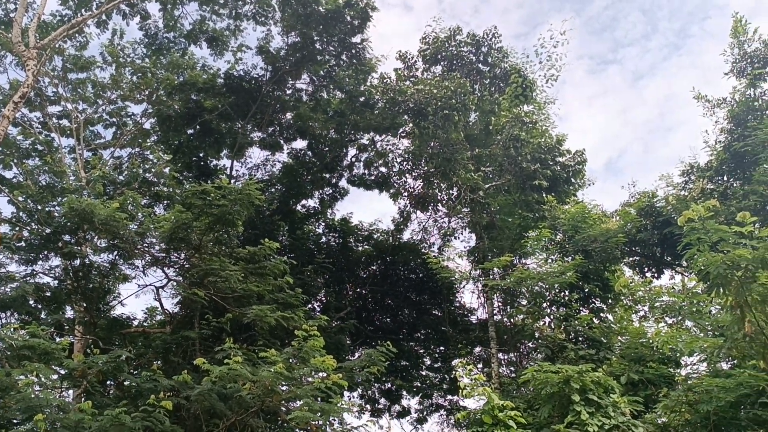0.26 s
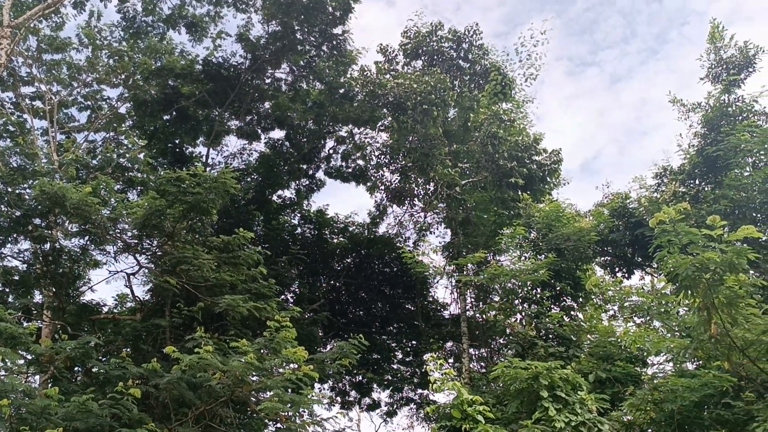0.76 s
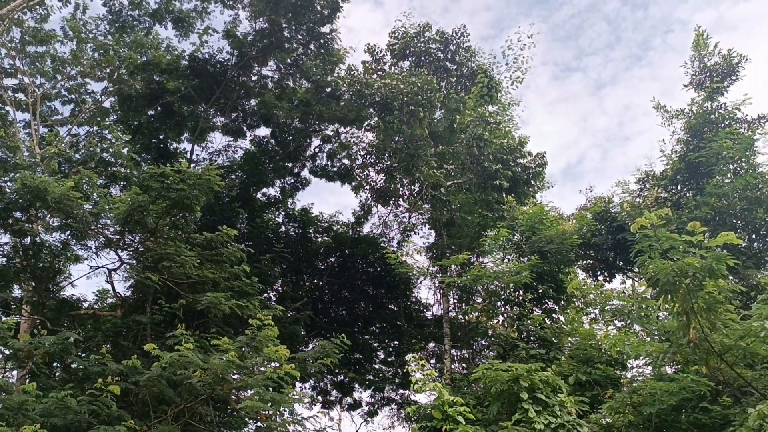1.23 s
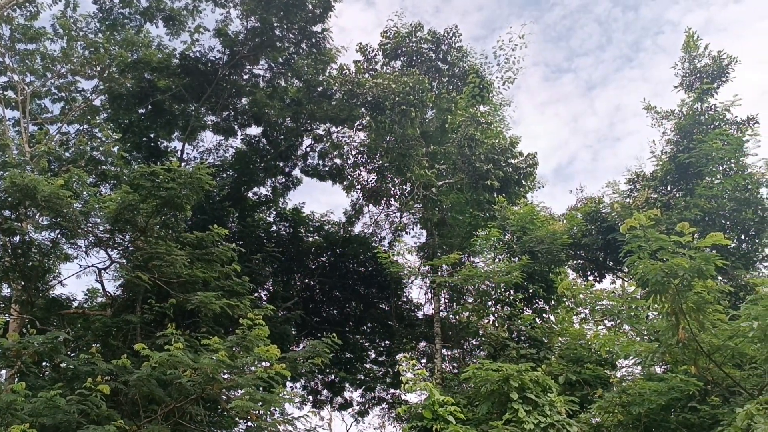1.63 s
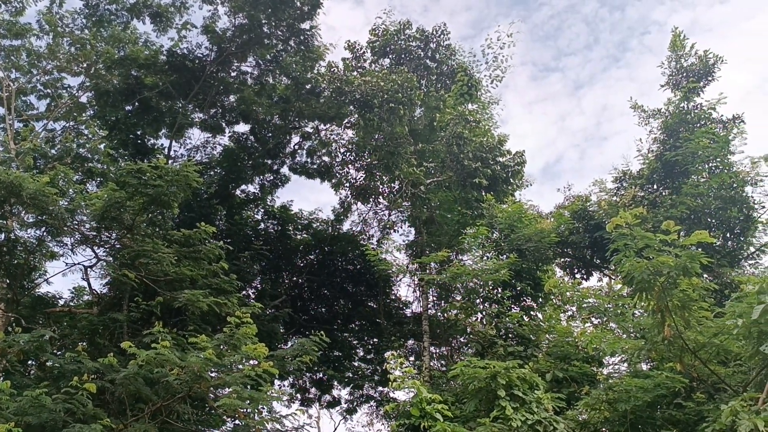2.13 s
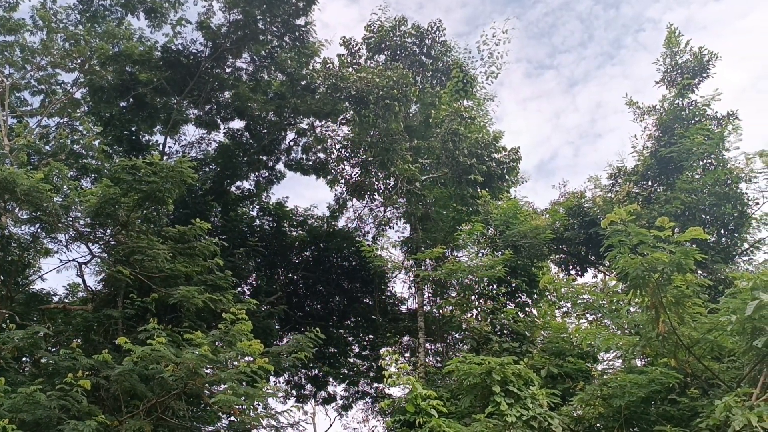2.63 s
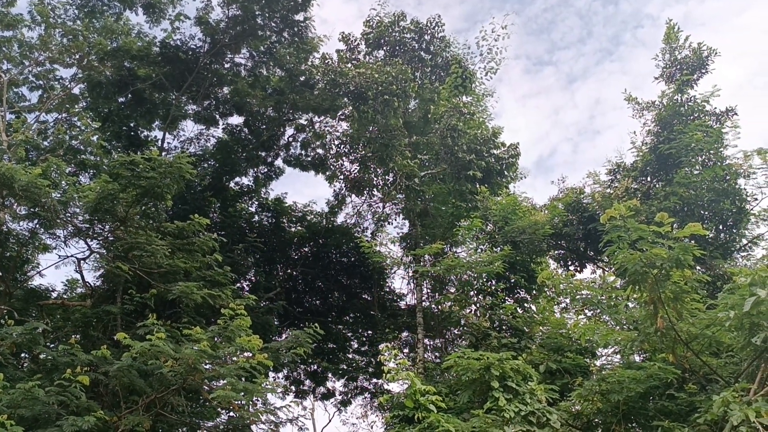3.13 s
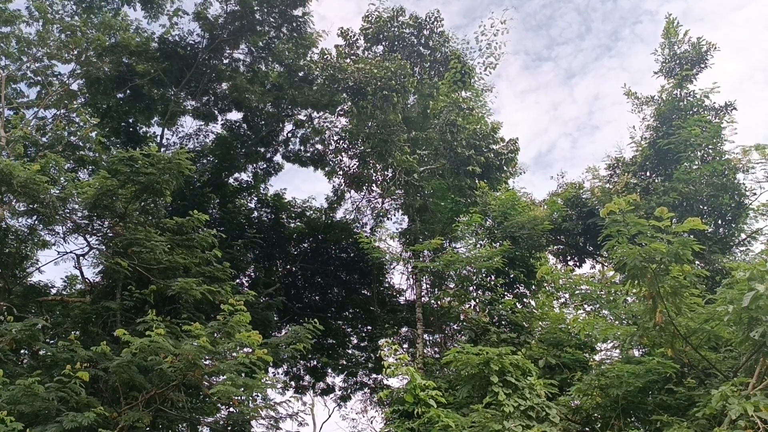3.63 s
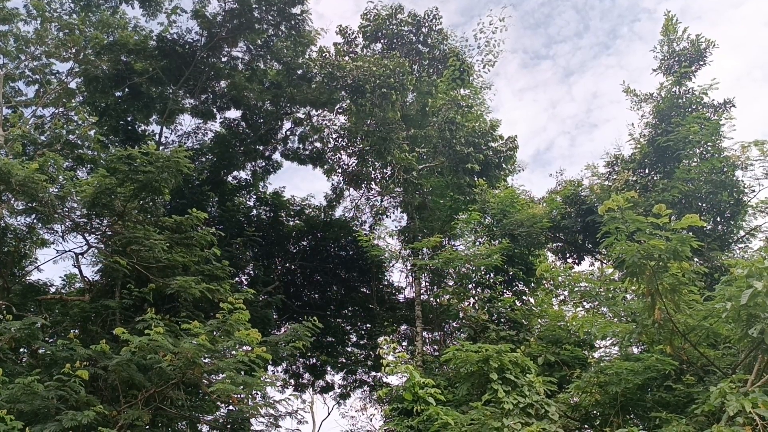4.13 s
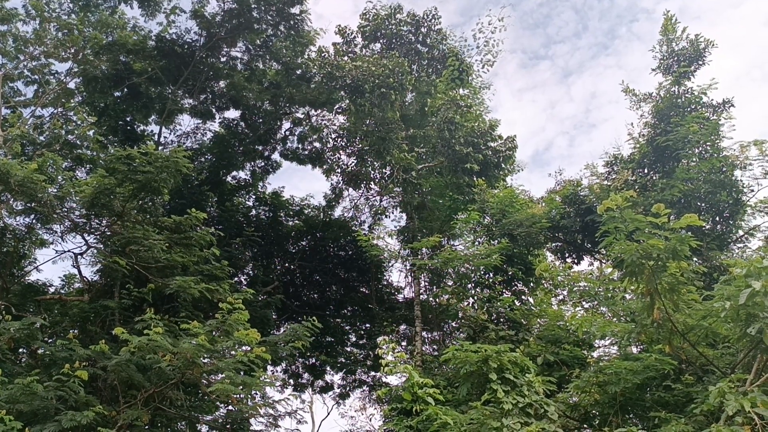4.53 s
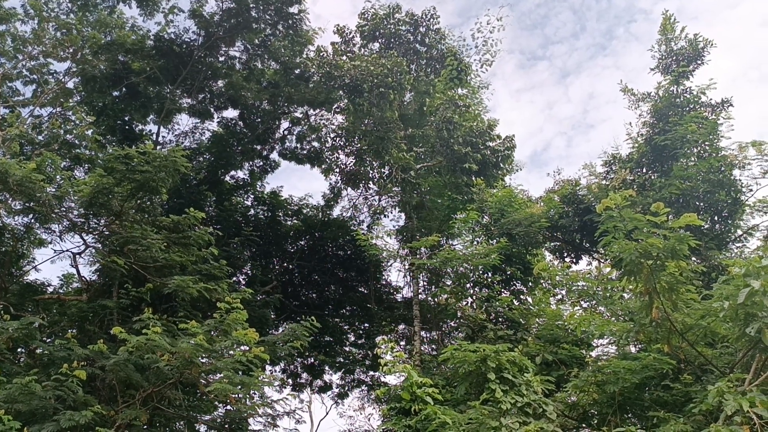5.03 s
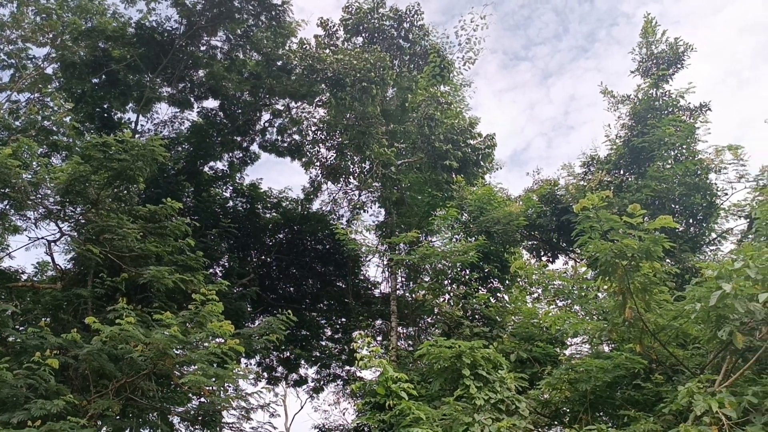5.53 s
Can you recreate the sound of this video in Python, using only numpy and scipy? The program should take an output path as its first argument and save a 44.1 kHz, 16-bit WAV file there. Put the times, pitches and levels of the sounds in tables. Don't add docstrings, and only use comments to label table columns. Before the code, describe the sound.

Steady cicada ringing and high katydid rasps fill an open forest, with leaf noise and faint distant traffic. A large bird begins with weak hoarse croaks, grows louder and faster into rough honking cackles, then a second bird gives a short clear honk among thin whistles. Calls echo softly off trees; afterwards only insects remain. Hand-held stereo microphone, with soft finger bumps.

```python
import sys
import numpy as np
from scipy import signal
from scipy.fft import rfft, irfft
from scipy.io import wavfile
from scipy.ndimage import uniform_filter1d

SR = 44100
rng = np.random.default_rng(int(sys.argv[2]) if len(sys.argv) > 2 else 0)


def gain_from_db(level_db):
    decades = np.asarray(level_db, float) / 20
    return 10 ** decades


def to_wav(s):
    ch = np.atleast_2d(s).T
    pcm = np.round(np.clip(ch, -1, 1) * 32767)
    wavfile.write(sys.argv[1], SR, pcm.astype(np.int16))


N = 254016

# from t/s, to t/s, hoarseness (0-1)
LOCKS = [
    (2.185, 2.308, .02),
    (2.575, 2.632, .12),
    (2.915, 2.965, .3),
    (3.345, 3.392, .25),
    (3.478, 3.525, .35),
    (3.708, 3.748, .4),
]


def evened(x):
    return x / np.sqrt(np.mean(x ** 2) + 1e-20)


def read(points, hz, axis=1):
    table = np.transpose(points)
    return np.interp(np.log(hz + 1), np.log(table[0] + 1), table[axis])


def columns(rows, t):
    s, *values = np.transpose(rows)
    return [np.interp(t, s, v) for v in values]


def add(mix, s, sound):
    part = mix[round(s * SR):][:len(sound)]
    part += sound[:len(part)]


def resonate(x, hz, width):
    turn = np.exp(2j * np.pi * np.cumsum(hz * np.ones(x.shape[-1])) / SR)
    r = np.exp(-np.pi * width / SR)
    two_poles = np.convolve([1, -r], [1, -r])
    return 2 * (turn * signal.lfilter([(1 - r) ** 2], two_poles, x / turn + 1e-18)).real


def wander(count, s):
    return evened(uniform_filter1d(rng.standard_normal(count), max(int(s * SR), 1)))


def edges(count, s=0.00059):
    return signal.windows.tukey(count, 2 * s * SR / count)


def far_hiss(shape_db, patchy_db):
    # f/Hz, coherence (0-1)
    likeness = [(30, 1), (130, 0.48), (400, 0.61), (1500, 0.055), (5500, 0.033), (15000, 0.067)]
    frames, hz = N // 256 + 5, np.fft.rfftfreq(1024, 1 / SR)
    a, b, c, d, patches = rng.standard_normal((frames, 513, 5)).T
    patches = evened(uniform_filter1d(uniform_filter1d(patches, 12, 0), 16, 1))
    same = np.clip(read(likeness, hz), 0, 1)[:, None]
    left, own = a + 1j * b, c + 1j * d
    late = np.exp(-2j * np.pi * hz * 0.000529)[:, None]
    z = np.array([left, same * left * late + np.sqrt(1 - same ** 2) * own])
    z = z * gain_from_db(shape_db(hz)[:, None] + patchy_db * patches)
    return evened(signal.istft(z, nperseg=1024, noverlap=768)[1][:, :N])


def air():
    # f/Hz, level/dB per Hz
    forest = [(25, -61), (150, 1), (300, -4), (600, -6), (900, -7.5), (1700, -10), (2500, -5.5),
              (4000, -3.5), (6500, -28), (8300, -23.5), (9800, -19), (11000, -12.5), (16000, -15.5)]
    traffic = [(25, -49), (45, -48), (62, 12.5), (105, -2.5), (200, -11.5), (500, -21.5), (900, -77)]
    hum = far_hiss(lambda hz: read(traffic, hz), 1.78)
    rest = far_hiss(lambda hz: read(forest, hz), 1.5)
    return gain_from_db(-56.5) * hum + gain_from_db(-52.5) * rest


def throb(per_s, depth, sharp):
    turns = np.cumsum(per_s * (1 + 0.0066 * wander(N, 1.0))) / SR
    return evened(1 - depth + depth * np.exp(-(turns % 1) / sharp))


def swells(t):
    # t/s, level/dB
    tops = [(.34, -53.5), (1.02, -58), (1.8, -55), (2.34, -57), (2.61, -52.5), (3.35, -52), (3.76, -54),
            (4.2, -54), (4.982, -55.5), (5.14, -58), (5.76, -58)]
    rise_db_per_s, cut_db_per_s, rest_db = 31, 122, -62
    s, db = np.transpose(tops)[:, :, None]
    each = db - rise_db_per_s * np.maximum(s - t, 0) - cut_db_per_s * np.maximum(t - s, 0)
    return np.maximum(each.max(0), rest_db)


def insects():
    # f/Hz, level/dB per Hz
    body = [(2650, -54), (4500, -21.5), (5010, -11), (5240, -4.5), (5520, 6), (5780, -5.5), (5970, -9),
            (6230, -14.5), (6660, -25.5), (7600, -30), (9880, -137), (16700, -120)]
    # t/s, level/dB
    nearest = [
        (0, -62),
        (.35, -61.5),
        (1.3, -57),
        (1.9, -62.5),
        (5.76, -63.5),
    ]
    octave_band = [(9200, -54), (10200, -11), (10850, -4), (11100, 1.0), (11400, -8), (12500, -64)]
    rasp_band = [(8500, -77), (10000, -9), (12500, -1.0), (16000, -3.5)]
    t = np.arange(N) / SR
    clicks = throb(78, 0.96, 0.59)
    chorus = evened(far_hiss(lambda hz: read(body, hz), 0.66) * (1.2 + 0.14 * clicks))
    octave = clicks * far_hiss(lambda hz: read(octave_band, hz), 2.3)
    rasp = throb(52, 0.59, .4) * far_hiss(lambda hz: read(rasp_band, hz), 1.5)
    chorus_db = -38 + .5 * wander(N, 0.18) + 3.5
    octave_db = columns(nearest, t)[0] - 2.5
    return gain_from_db(chorus_db) * chorus + gain_from_db(octave_db) * octave + gain_from_db(swells(t) + 1.0) * rasp


def knocks():
    # t/s, level/dB, f/Hz, t60/s
    pushes = [
        (0.046, -45.5, 110, 0.034),
        (0.359, -39, 109, 0.045),
        (5.217, -40, 110, 0.066),
        (5.568, -31.5, 107, 0.028),
    ]
    out, t = np.zeros(N), np.arange(SR // 8) / SR
    for s, db, hz, t60 in pushes:
        add(out, s, gain_from_db(db - 60 * t / t60) * np.sin(2 * np.pi * hz * t))
    return out


def trees(x):
    # f/Hz, t60/s, level/dB
    decay = [(300, 0.98, 0), (1010, 0.69, -2.5), (2140, 0.71, 9), (4570, 0.41, 11), (8150, 0.31, 2)]
    taps = np.zeros((2, SR))
    at = np.arange(500, SR - 20, 20) + rng.integers(0, 20, (2, (SR - 501) // 20))
    np.put_along_axis(taps, at, rng.choice([-1., 1.], at.shape), 1)
    hz, t, z = signal.stft(taps, SR, nperseg=256)
    fall_db = read(decay, hz, axis=2)[:, None] - 60 * t / read(decay, hz)[:, None]
    tail = signal.istft(z * gain_from_db(fall_db), SR, nperseg=256)[1]
    return signal.fftconvolve(x[None], tail / np.linalg.norm(tail[0]), axes=1)[:, :N]


def leaves(x):
    t = np.arange(SR // 20) / SR
    scatter = rng.standard_normal((2, len(t))) * gain_from_db(-60 * t / 0.068)
    scatter = signal.sosfilt(signal.butter(4, 1800, "high", fs=SR, output="sos"), scatter)
    return signal.oaconvolve(x[None], scatter / np.linalg.norm(scatter[0]), axes=1)[:, :N]


def whistle(start, length, from_hz, to_hz, top_db):
    t = np.arange(start, start + length, 1 / SR)
    u = (t - start) / length
    from_top = abs(u if from_hz > to_hz else 1 - u)
    hz = max(from_hz, to_hz) - abs(from_hz - to_hz) * from_top ** 2.6
    db = top_db - 9 * (2 * u - 1) ** 2
    waver = 1 + .008 * wander(len(t), .01)
    swell_db = 2.5 * wander(len(t), .012)
    tone = np.cos(2 * np.pi * np.cumsum(hz * waver) / SR)
    return t[0], np.sqrt(2) * gain_from_db(db + swell_db) * tone * edges(len(t))


def folds(hz, hoarse, flutter, orders):
    flutter_hz = 177.3
    shake = 0.0065 + 0.1415 * hoarse ** 2
    turns = np.cumsum(hz * (1 + shake * wander(len(hz), 0.00417))) / SR
    flaps = np.cumsum(flutter_hz * (1 + .12 * wander(len(hz), 0.0068))) / SR
    tone = sum(gain_from_db(db) * np.cos(2 * np.pi * k * turns) for k, db in orders)
    tone = tone * (1 + flutter * np.cos(2 * np.pi * flaps))
    strength = gain_from_db(2 * rng.standard_normal(len(hz)))[flaps.astype(int)]
    puffs = (.25 + strength * np.exp(-(flaps % 1) / .4)) * rng.standard_normal(len(hz))
    return tone, puffs


def honk():
    # t/s, effort level/dB, pitch f/Hz, hoarseness (0-1)
    course = [
        (4.056, -43, 544, 0.1),
        (4.068, -34, 533.6, 0.04),
        (4.09, -34, 560.4, 0),
        (4.125, -38, 540.4, 0.03),
        (4.14, -36.5, 511, 0.08),
        (4.16, -63, 515, 0.1),
    ]
    orders = [(1, -11), (2, 1), (2.5, -11), (3, -12), (4, -21), (5, -14), (6, -5), (7.8, -18)]
    t = np.arange(course[0][0], course[-1][0], 1 / SR)
    effort_db, hz, hoarse = columns(course, t)
    hoarse = np.clip(hoarse, 0, 1)
    tone, puffs = folds(hz, hoarse, 0, orders)
    rasp = evened(resonate(puffs, 1330, 230))
    voice = np.sqrt(1 - hoarse) * evened(tone) + np.sqrt(hoarse) * rasp
    return t[0], gain_from_db(effort_db) * voice * edges(len(t))


def locked(t, loose, tight):
    for (start, end, hoarse), value in zip(LOCKS, tight):
        hold = np.clip(np.minimum(t - start, end - t) / .012, 0, 1)
        loose = loose + hold * (value - loose)
    return loose


def cackle(start, length, top_db, top_hz, rising):
    lower_throat = [(.36, 152, -34.5, -13), (.5, 210, -32, -13), (.74, 217, -31, -7.5), (1, 147, 1, 7),
                    (1.02, 528, -13, -3.5), (1.22, 300, -10.5, 1), (1.7, 300, -34.5, -13)]
    # f/Hz, width/Hz, level/dB
    upper_throat = [(2060, 380, -3.5), (2677, 527, 2.5), (3690, 2130, -7), (6850, 2200, -32)]
    # t/s, new pitch f/Hz, glide/s
    jumps = [
        (2.968, 531.8, 0.011),
        (3.478, 490, .03),
        (3.75, 537.3, .018),
    ]
    loud_db, flutter_low, flutter_high = -28, .25, .65
    t = np.arange(start, start + length, 1 / SR)
    u = (t - start) / length

    under_db = 24 * np.maximum(1 - u / rising, 0) ** (1.323 + 7.0 * length)
    past_db = 18.5 * np.maximum((u - rising) / (1 - rising), 0) ** (1.323 + 6.4 * length)
    effort_db = top_db - under_db - past_db

    hz, mouth_hz, flutter = top_hz, top_hz * (2 if top_hz > 480 else 3), flutter_low
    for s, new_hz, glide in jumps:
        if start < s < start + length:
            moved = np.clip((t - s) / glide, 0, 1)
            hz = hz + moved * (new_hz - hz)
            mouth_hz = mouth_hz + moved * (2 * new_hz - mouth_hz)
            flutter = flutter + moved * (flutter_high - flutter) * (new_hz > top_hz)
    sag = 1 - .008 * under_db
    hz, mouth_hz = hz * sag, mouth_hz * sag

    hoarse = np.clip(.64 + .017 * (loud_db - effort_db), 0, 1)
    hoarse = locked(t, hoarse, [row[2] for row in LOCKS])
    flutter = locked(t, flutter, [0 for row in LOCKS])
    clear_step_db = locked(t, 0, [-8.5 * (1 - row[2]) ** 2 for row in LOCKS])
    upper_db = -7.5 - .035 * (top_db - loud_db) ** 2 + 2 * u + clear_step_db

    orders = [(0.94, -3.5)] + [(k, -7.0 * max(k - 8, 0)) for k in range(2, 13)]
    tone, puffs = folds(hz, hoarse, flutter, orders)
    drive = np.sqrt(1 - hoarse) * evened(tone) + 2.42 * np.sqrt(hoarse) * puffs
    breathy = drive + 1.0 * puffs
    lower = upper = 0
    for k, (factor, width, clear_db, hoarse_db) in enumerate(lower_throat):
        db = clear_db + np.sqrt(hoarse) * (hoarse_db - clear_db)
        lower = lower + (-1) ** k * gain_from_db(db) * resonate(drive, factor * mouth_hz, width)
    for k, (f, width, db) in enumerate(upper_throat):
        upper = upper + (-1) ** k * gain_from_db(db) * resonate(breathy, f, width)
    lower, upper = [v / np.sqrt(uniform_filter1d(v ** 2, 1500) + 1e-9) for v in (lower, upper)]
    loudness_db = effort_db + locked(t, 0, [2.5 for row in LOCKS])
    return t[0], gain_from_db(loudness_db) * (lower + gain_from_db(upper_db) * upper) * edges(len(t))


def scene():
    # t/s, length/s, top effort level/dB, top pitch f/Hz, share of the length spent rising (0-1)
    syllables = [(0.435, 0.15, -48, 262, 0.37), (0.915, 0.18, -43, 325, 0.6),
                 (1.335, .19, -37.5, 366.7, 0.81), (1.528, 0.072, -36.5, 343.5, 0.27),
                 (1.8, 0.17, -34.5, 372.6, 0.82), (1.988, 0.048, -28.5, 354.4, 0.32),
                 (2.048, 0.046, -32.5, 366.7, 0.23), (2.16, .18, -28, 357.8, 0.59),
                 (2.51, .14, -28.5, 380, 0.86), (2.668, 0.066, -28, 365.9, .3),
                 (2.755, 0.056, -28, 369, 0.29), (2.815, 0.049, -36.5, 386.5, 0.29),
                 (2.905, .245, -27.5, 380.5, 0.46), (3.325, 0.14, -27, 396, .55),
                 (3.469, 0.057, -24, 590, 0.2), (3.545, 0.054, -25.5, 563, 0.53),
                 (3.606, 0.049, -28, 545.6, 0.41), (3.705, 0.19, -27.5, 386.2, .55),
                 (3.918, .052, -35, 425, 0.13)]
    # t/s, length/s, from f/Hz, to f/Hz, level/dB; mostly small birds, but the glide at 4.036 s
    whistles = [
        (3.668, .1, 1180, 1680, -44),
        (3.838, .04, 1636, 1600, -35),
        (3.885, .125, 1590, 1580, -54),
        (4.036, .032, 1270, 1080, -33),
        (4.058, .097, 1675, 1330, -37),
        (5.35, .13, 1155, 1130, -66),
    ]
    birds = np.zeros(N)
    calls = [*(cackle(*row) for row in syllables), honk(), *(whistle(*row) for row in whistles)]
    for s, sound in calls:
        add(birds, s, sound)
    birds = birds - .85 * resonate(birds, 600, 110)
    through = birds - .5 * resonate(birds, 3930, 5700)
    direct = np.array([through, np.roll(through, 5)])
    heard = gain_from_db(1.5) * direct + gain_from_db(1.0) * leaves(birds) + gain_from_db(-6.5) * trees(birds)
    return heard + insects() + air() + knocks()


def low_pass(x):
    return signal.sosfilt(signal.butter(12, 16270, fs=SR, output="sos"), x)


def record(dry):
    # f/Hz, left minus right level/dB
    port_split = [(60, 6), (92, -5.5), (140, 9.5), (210, -2.5), (330, 1.5), (500, 1), (770, -0.5),
                  (1170, -1.5), (1790, -5), (2740, -3), (4190, -9.5), (6410, -4.5), (9810, 10), (15000, 21)]
    hz = np.fft.rfftfreq(N, 1 / SR)
    tilt = gain_from_db(np.outer([.5, -.5], read(port_split, hz)))
    ports = tilt / np.sqrt((tilt ** 2).mean(0))
    ports = ports * (hz < 15780) * hz ** 3 / (hz ** 3 + 60.5 ** 3)
    return low_pass(irfft(rfft(dry) * ports, N))


dry = scene()
out = record(dry)
to_wav(out)
```